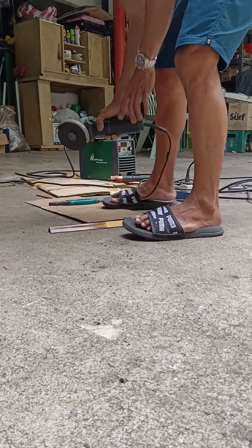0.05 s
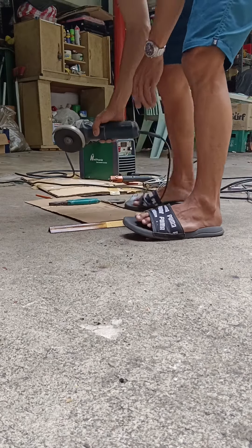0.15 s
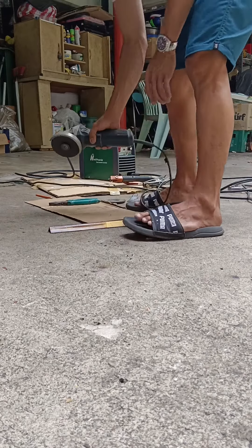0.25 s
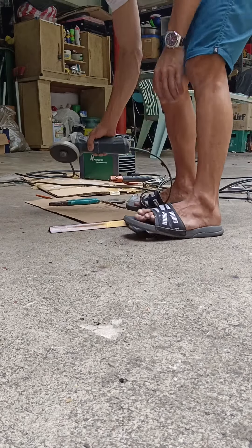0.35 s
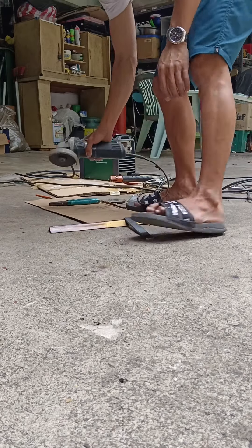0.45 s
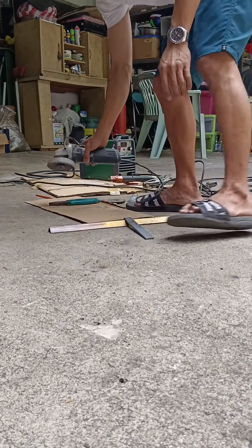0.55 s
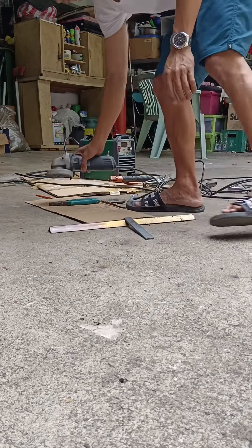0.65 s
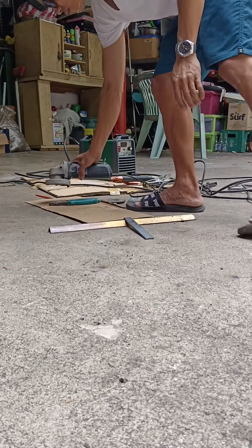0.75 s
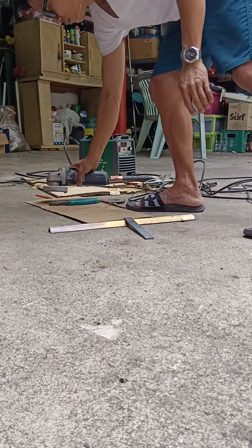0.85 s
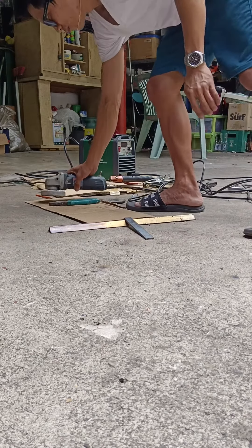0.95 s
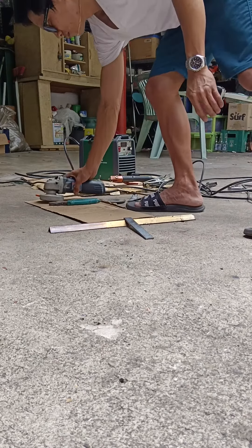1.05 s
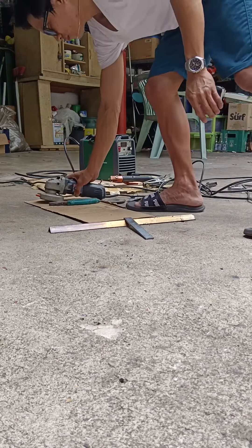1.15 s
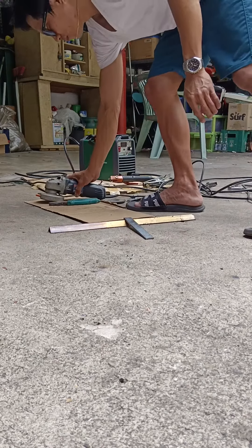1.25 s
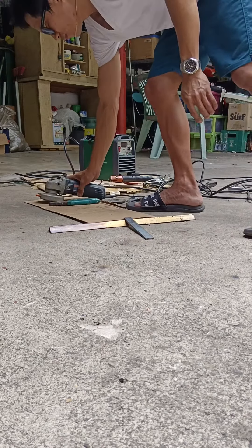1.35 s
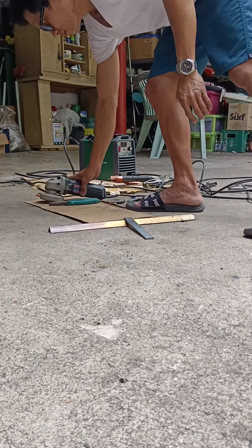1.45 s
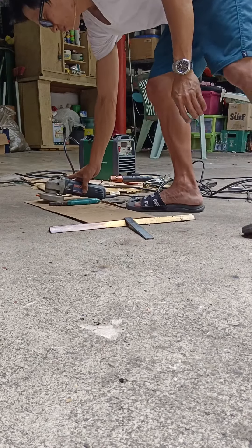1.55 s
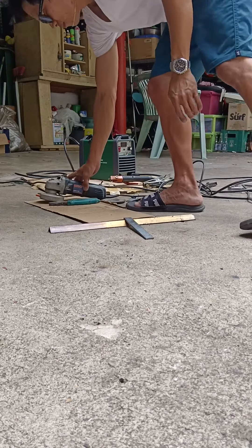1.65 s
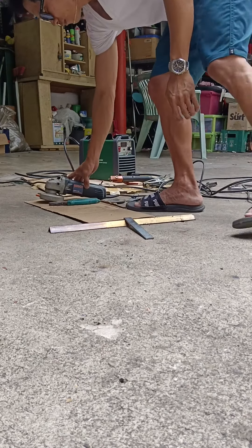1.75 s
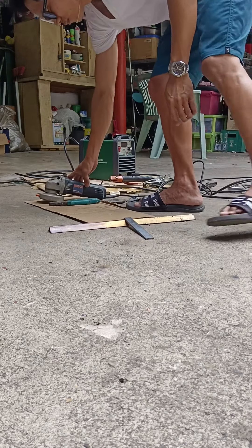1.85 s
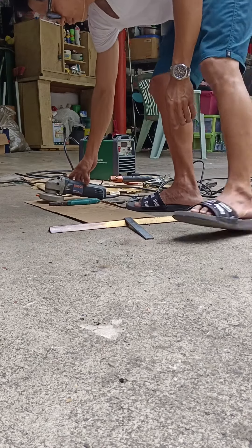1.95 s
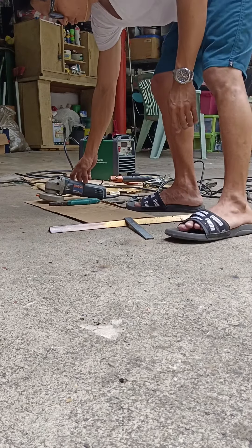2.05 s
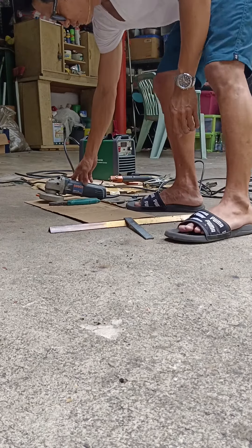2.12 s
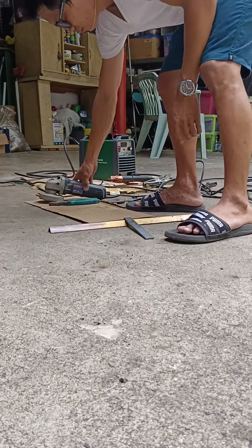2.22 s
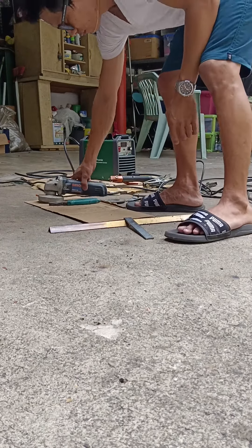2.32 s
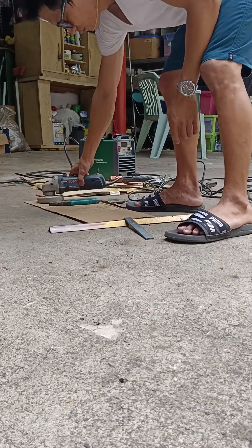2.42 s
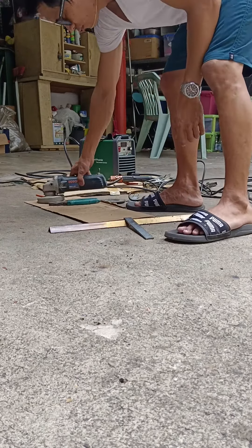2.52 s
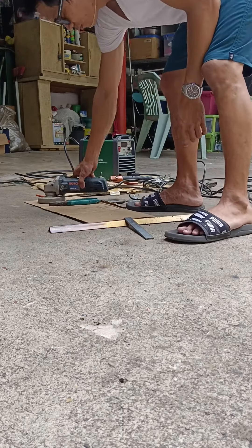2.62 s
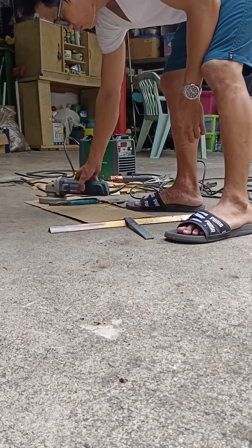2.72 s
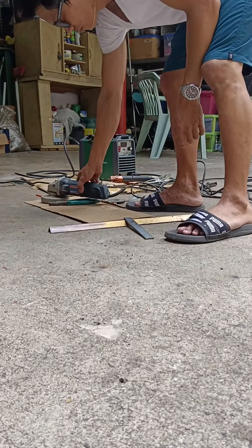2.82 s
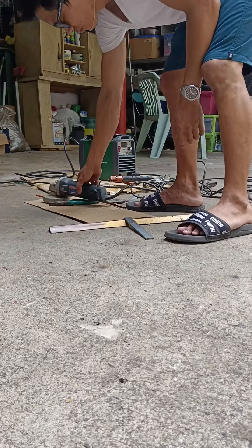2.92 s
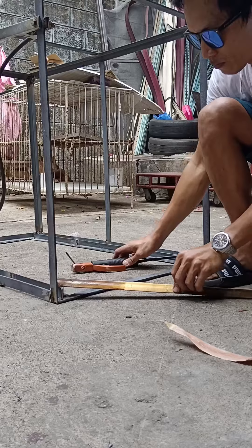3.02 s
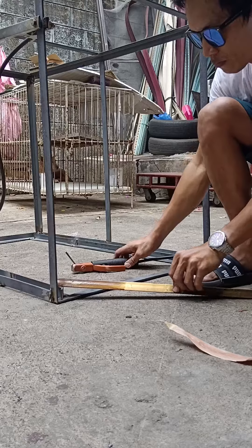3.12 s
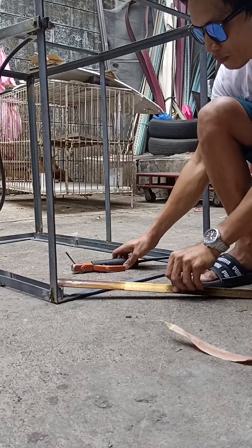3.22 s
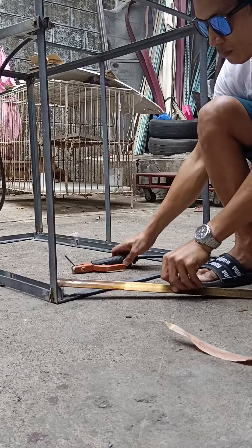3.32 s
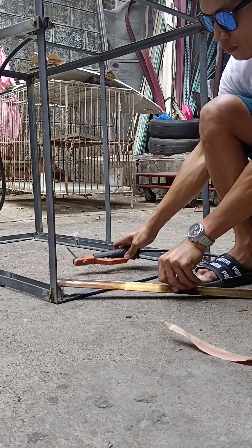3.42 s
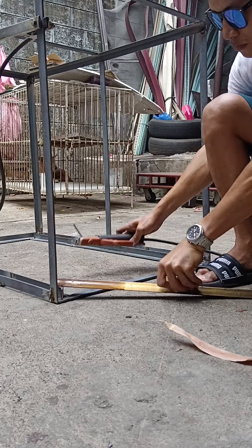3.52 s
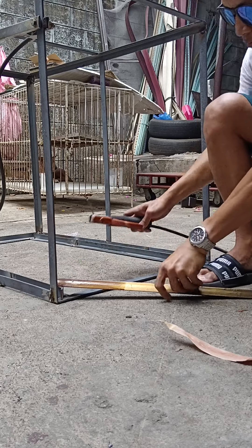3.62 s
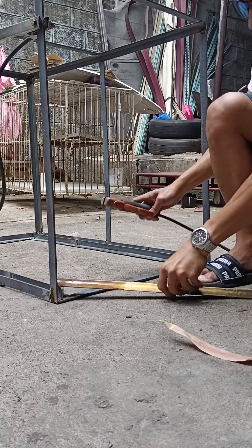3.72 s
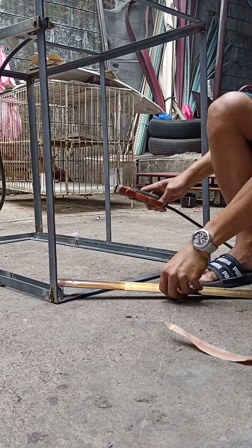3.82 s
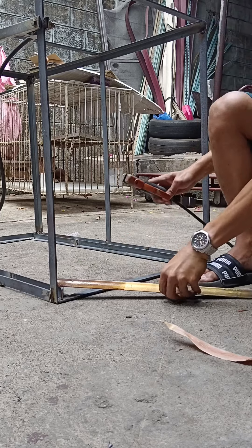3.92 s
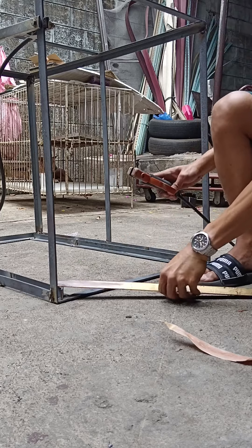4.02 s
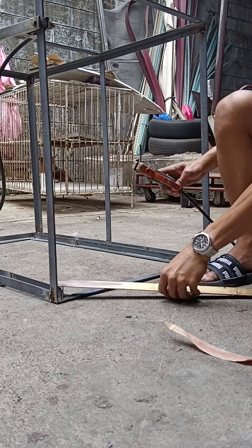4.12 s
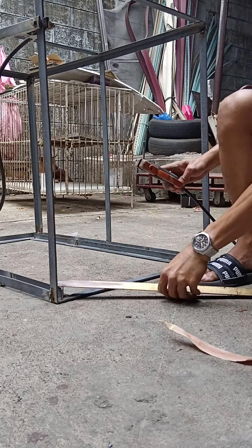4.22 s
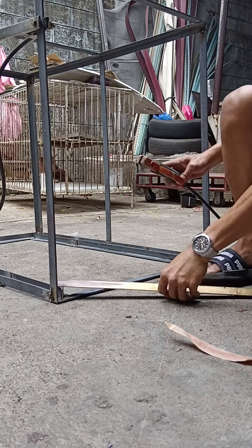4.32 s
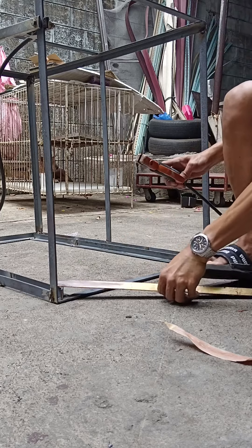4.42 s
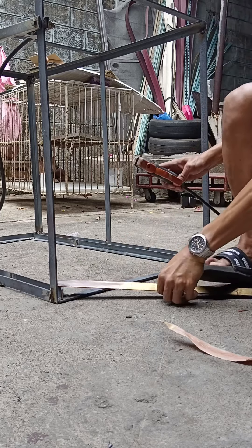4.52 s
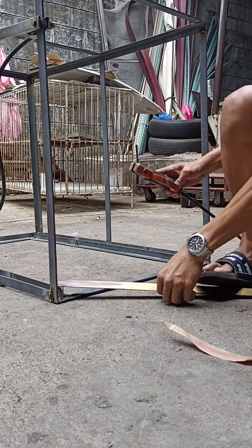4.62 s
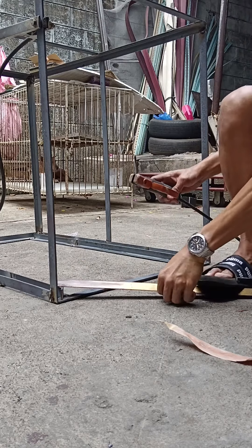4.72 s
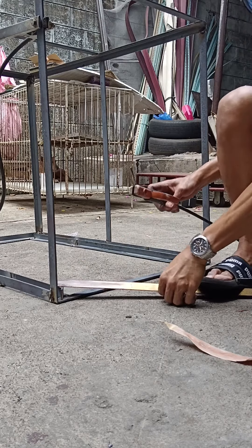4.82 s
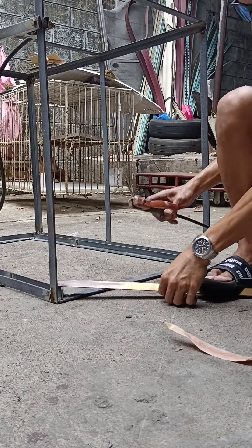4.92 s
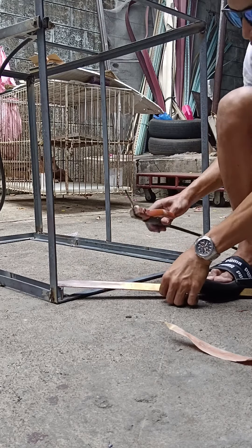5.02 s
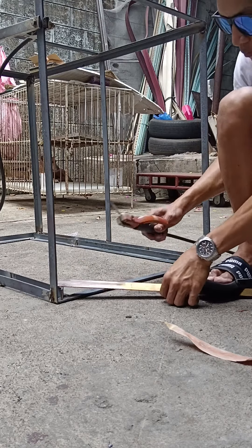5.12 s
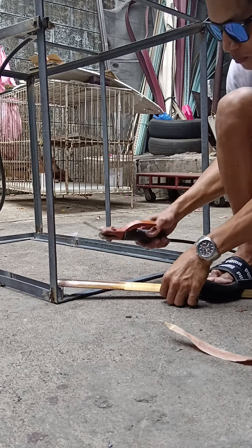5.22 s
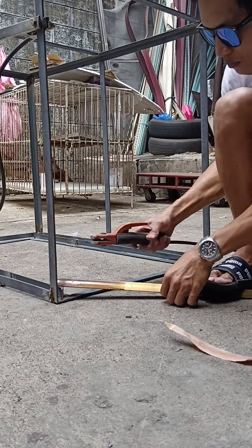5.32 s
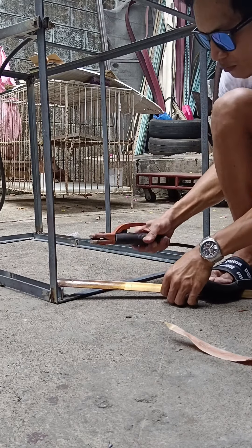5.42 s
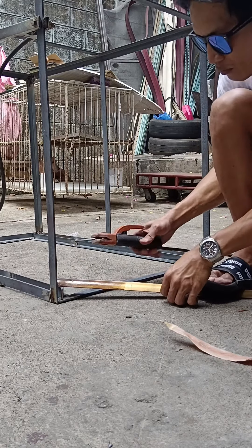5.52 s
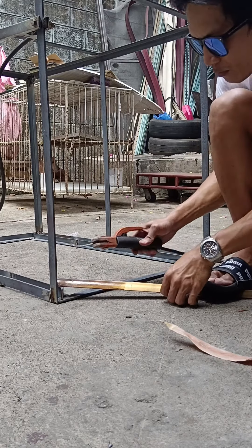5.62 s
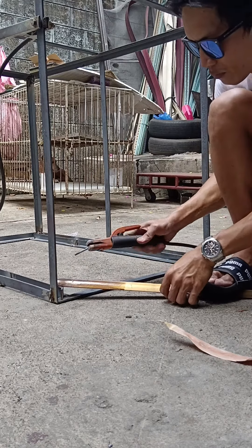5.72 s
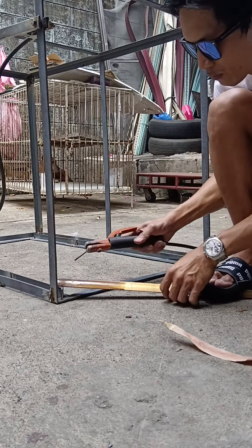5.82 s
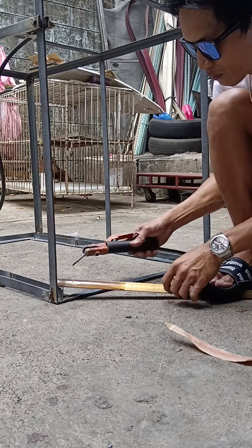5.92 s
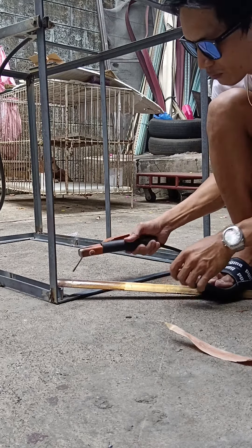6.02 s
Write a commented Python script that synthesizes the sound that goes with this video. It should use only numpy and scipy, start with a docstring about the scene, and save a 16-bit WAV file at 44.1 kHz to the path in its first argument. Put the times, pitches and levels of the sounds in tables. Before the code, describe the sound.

An angle grinder coasts down in a garage, whine sinking into gear rattle, then abruptly a quiet yard where a steel frame clangs.

```python
"""In a concrete garage an angle grinder coasts down: its rotor whine sinks, its gears hiss and rattle.
The whine is a sine; gears, hiss and growl are filtered noise; knocks and short fluttering tones join in.
The sound breaks off abruptly. In a quiet yard a welded steel frame is knocked and rings in clusters of
modes over a dense clatter. A tool ticks, feet thud, clothes rustle, thin tones squeak and softly clink,
and a low drone of narrow noise swells briefly on the left."""
import sys
import numpy as np
from scipy import signal
from scipy.fft import rfft, irfft
from scipy.io import wavfile
from scipy.ndimage import uniform_filter1d

SR = 44100
rng = np.random.default_rng(int(sys.argv[2]) if len(sys.argv) > 2 else 0)


def wav_record(signal):
    """Record a signal, one row per channel, as 16-bit PCM in the file named by sys.argv[1]."""
    frames = np.transpose(np.atleast_2d(signal))
    bounded = np.clip(frames, -1, 1)
    # unit amplitude maps onto the largest positive 16-bit level
    quanta = np.round(bounded * 32767).astype(np.int16)
    wavfile.write(sys.argv[1], SR, quanta)


N = 267246
T = np.arange(N) / SR  # time of each sample [s]
HZ = np.fft.rfftfreq(N, 1 / SR)  # frequency of each spectrum bin [Hz]
STOP_S = 2.937  # the grinder breaks off and the garage gives way to the yard


def amp(db):
    """Turns decibels into a gain."""
    return 10 ** (np.asarray(db) / 20)


def unit(x):
    """Scales to an rms of 1."""
    return x / np.sqrt(np.mean(x ** 2) + 1e-20)


def steadied(x):
    """Evens out slow level changes to a running rms of 1, keeping the fast grain."""
    return x / np.sqrt(abs(uniform_filter1d((x ** 2).mean(0), size=SR // 5)) + 1e-12)


def read(points, hz):
    """Reads a frequency table, with straight lines on a log-frequency axis."""
    f, value = np.transpose(points)
    return np.interp(np.log(hz + 1), np.log(f + 1), value)


def curve(rows, t=T):
    """Reads every column of a time table at times t."""
    s, *columns = np.transpose(rows)
    return [np.interp(t, s, c) for c in columns]


def lifts(resonances):
    """Bell-shaped resonances as a dB spectrum."""
    return sum(db / (1 + (2 * (HZ - hz) / width) ** 2) for hz, width, db in resonances)


def ripple(depth_db, width_hz):
    """Many small fixed peaks and dips from modes and near reflections, in dB for each microphone."""
    knots = np.arange(0, SR, width_hz)
    heights = rng.standard_normal((2, len(HZ)))[:, :len(knots)]
    return depth_db * np.array([np.interp(HZ, knots, np.clip(row, -1.7, 1.7)) for row in heights])


def colour(x, db):
    """Filters by a dB spectrum, keeping the power of white noise."""
    return irfft(rfft(x) * unit(amp(db)), N)


def ring(x, db):
    """Filters by a dB spectrum so that resonances ring only after they are struck."""
    cepstrum = irfft(np.log(unit(amp(db)) + 1e-5), N)
    # folding the cepstrum forward in time gives a minimum-phase filter
    cepstrum[1:N // 2] *= 2
    cepstrum[N // 2 + 1:] = 0
    taps = irfft(np.exp(rfft(cepstrum)), N)[:4096]
    return signal.oaconvolve(x, taps[None], axes=1)[:, :N]


def noise(likeness=((100, 0), (1000, 0))):
    """Stereo white noise whose channels are alike by a share that depends on frequency."""
    a, b = rfft(rng.standard_normal((2, N)))
    same = np.clip(read(likeness, HZ), -1, 1)
    return irfft(np.array([a, same * a + np.sqrt(1 - same ** 2) * b]), N)


def split(x, hz):
    """Splits a sound into the parts below and above a frequency."""
    low = signal.lfilter(*signal.butter(4, hz, fs=SR), x)
    high = signal.lfilter(*signal.butter(4, hz, "high", fs=SR), x)
    return low, high


def morph(x, rule, size=256):
    """Applies a gain in dB that follows rule(Hz, s)."""
    overlap = size * 3 // 4
    hz, t, z = signal.stft(x, SR, nperseg=size, noverlap=overlap)
    shaped = z * amp(rule(hz[:, None], t))
    return signal.istft(shaped, SR, nperseg=size, noverlap=overlap)[1][:, :x.shape[-1]]


def burst(s, rise, fall):
    """Envelope that rises from time s and dies away."""
    age = np.maximum(T - s, 0)
    return np.minimum(age / rise, 1) * np.exp(-np.minimum(age / fall, 50))


def swell(s, length):
    """Envelope that fades in and out around time s."""
    return np.exp(-(2 * (T - s) / length) ** 2)


def placed(x, balance, phase=((100, 0), (1000, 0))):
    """Leans a sound left or right and lets one microphone lead, by frequency."""
    lean = np.array([[.5], [-.5]])
    return irfft(rfft(x) * amp(lean * read(balance, HZ)) * np.exp(1j * lean * read(phase, HZ)), N)


# how long echoes of hard walls last: (frequency [Hz], time to fall by 60 dB [s])
ECHO_T60 = [(300, 0.43), (2000, 0.34), (6000, 0.24), (14000, 0.24)]


def room(x, wet_db):
    """Adds echoes of hard walls: fading noise, unrelated at the two microphones."""
    tail = morph(rng.standard_normal((2, SR // 2)), lambda hz, t: -60 * t / read(ECHO_T60, hz))
    tail *= np.minimum(T[:SR // 2] / 0.014, 1)
    wet = signal.fftconvolve(x, tail / np.linalg.norm(tail[0]), axes=1)[:, :N]
    return x + amp(wet_db) * wet


# the rotor coasting down: (time [s], speed [turns per second])
ROTOR_SPEED = [(0, 511), (.1, 486), (.3, 451), (.5, 421), (1.8, 250), (2.95, 124)]
GEAR_RATIO = 4.1  # rotor turns for one turn of the disc


def rotor_speed(t=T):
    """Rotor speed in turns per second, which sinks as the grinder coasts."""
    return curve(ROTOR_SPEED, t)[0]


# the whine holds its level, then fades as its pitch sinks
WHINE_DB, WHINE_FADES_BELOW_HZ, WHINE_FADE_DB_PER_HZ = -38.3, 450, 1.6
# pitches at which the whine dips: (pitch [Hz], width [Hz], level change [dB])
WHINE_DIPS = [(470, 18, -15), (435, 10, -17)]


def whine(waver=0.019):
    """The unbalanced rotor hums at its own speed, dips at some pitches and fades as it slows."""
    speed = rotor_speed()
    level = WHINE_DB - WHINE_FADE_DB_PER_HZ * np.maximum(WHINE_FADES_BELOW_HZ - speed, 0)
    level += sum(db * np.exp(-(2 * (speed - hz) / width) ** 2) for hz, width, db in WHINE_DIPS)
    wobble = unit(uniform_filter1d(rng.standard_normal(N), 300))
    turns = np.cumsum(speed * (1 + waver * wobble)) / SR
    return amp(level) * np.sqrt(2) * np.sin(2 * np.pi * turns)


# resonances of gear case and disc: (frequency [Hz], width [Hz],
# lift at full speed [dB], lift at middle speed [dB], lift when slowest [dB])
CASE_RESONANCES = [(776, 150, 0.5, 13.5, 10.5), (1010, 40, 1, -4, -4.5), (1049, 28, -2, 0, 20),
                   (1250, 170, -2, 4, 1.5), (1440, 20, 1, -2.5, -7), (1490, 80.5, -0.5, 1.5, 2.5),
                   (1748, 96, -4.5, 3, 8), (1996, 85, 4, 6, 9.5), (2130, 210, 6.5, 5.5, 3.5),
                   (2280, 73, 0.5, 2.5, -4.5), (2406, 260, 7.5, -1, 5.5), (2653, 200, -1.5, 4, 8),
                   (3140, 65, 3, -8, 8), (3375, 110, 0.5, 2, 12.5), (3830, 250, -5, -0.5, 6),
                   (4810, 250, -6, -4, -12.5), (5670, 540, 9, -1, 2.5), (6700, 240, 4, 0.5, 0),
                   (7290, 190, 4.5, 3.5, 3), (11800, 2700, 0.5, -0.5, 1)]


def case_lifts(stage):
    """The gear case's resonances at full (0), middle (1) or lowest (2) speed."""
    return lifts([(row[0], row[1], row[2 + stage]) for row in CASE_RESONANCES])


# how alike left and right are: (frequency [Hz], likeness [-1 to 1])
GRINDER_LIKENESS = [(60, 1), (400, 1), (700, .86), (1290, 0.52), (2380, 0.28), (4400, 0.18), (5700, .3),
                    (9000, .02)]


def case_noise(patchy_db, middle_speed=290, smooth_share=.55, size=1024):
    """Noise in the case's resonances, which shift in strength with speed and flare more as it slows."""
    def rule(hz, t):
        speed = rotor_speed(t)
        # blend the three stages: full, middle and lowest speed [turns per second]
        shares = [np.interp(-speed, [-460, -middle_speed, -160], one) for one in np.eye(3)]
        resonances = sum(np.interp(hz, HZ, case_lifts(stage)) * share for stage, share in enumerate(shares))
        flares = rng.standard_normal(resonances.shape)
        flares = uniform_filter1d(uniform_filter1d(flares, size=9, axis=1), size=2, axis=0)
        flares = np.minimum(unit(flares), 1.5)
        patchiness = patchy_db * (1 - smooth_share * (speed / speed.max()) ** 2)
        return resonances + patchiness * flares
    return colour(morph(noise(GRINDER_LIKENESS), rule, size=size), ripple(depth_db=3.0, width_hz=55))


def rattle(spread_db=-0.5, fall=0.0027):
    """The gears slap about twice in each turn of the disc, unevenly: an envelope of rms 1."""
    turns = np.cumsum(rotor_speed() / GEAR_RATIO * (1 + 6 * rng.standard_normal(N))) / SR
    slaps = np.diff(np.maximum.accumulate(np.floor(2 * turns)), prepend=0) > 0
    sizes = amp(spread_db * np.clip(rng.standard_normal(N), -2, 1.5))
    return unit(signal.lfilter([1], [1, -np.exp(-1 / (fall * SR))], slaps * sizes))


def looseness(fast=0.11, slow=.45):
    """The slower the grinder turns, the larger the share of its noise that rattles."""
    speed = rotor_speed()
    return np.clip(slow + (fast - slow) * speed / speed.max(), 0, 1)


def grain(share, slaps):
    """Mixes steady power with a share of the power of the slaps."""
    return np.sqrt(abs(1 - share + share * slaps ** 2))


# gear noise before its trim, also the base for ordinary knocks: (time [s], level [dB])
GEAR_LEVEL = [(0, -24.5), (.43, -27), (.55, -29.5), (1.1, -29.5), (1.55, -34), (1.72, -33.5), (1.92, -37),
              (2.08, -34), (2.27, -37), (2.41, -38), (2.49, -46), (2.56, -40), (2.75, -45), (2.92, -48.5)]
# tone of the gears: (frequency [Hz], relative level per Hz [dB])
GEAR_TONE = [(900, -60.5), (1250, -27.5), (1430, -17.5), (1570, -5), (1800, 0), (2400, -5), (2900, -4.5),
             (3800, -4), (4700, -11.5), (5500, -7.5), (8000, -50.5)]


def gear_noise(slaps, trim_db=1.2):
    """Meshing teeth make noise that rattles more as the gears slow."""
    gears = ring(case_noise(patchy_db=2.5) * grain(looseness(), slaps), read(GEAR_TONE, HZ))
    return amp(curve(GEAR_LEVEL)[0] + trim_db) * steadied(room(gears, wet_db=-7))


# the hiss before its trim: (time [s], level [dB])
HISS_LEVEL = [(0.13, -28.5), (1.33, -40), (2.2, -42), (2.85, -47.5)]
# tone of the hiss: (frequency [Hz], relative level per Hz [dB])
HISS_TONE = [(3500, -27.5), (4800, -2), (5600, -0.5), (6400, -4), (7500, -7), (8200, -10.5), (9800, -8.5),
             (11200, -8.5), (12100, -6.5), (13500, -13), (15700, -19)]


def hiss(slaps, trim_db=2.5, loose_share=0.59):
    """High noise that follows the same slaps, less strongly than the gears."""
    air = ring(case_noise(patchy_db=4.0) * grain(looseness() * loose_share, slaps), read(HISS_TONE, HZ))
    return amp(curve(HISS_LEVEL)[0] + trim_db) * steadied(room(air, wet_db=-15.5))


# the disc's growl before its trim: (time [s], level [dB])
GROWL_LEVEL = [(0.08, -33.5), (0.28, -33.5), (1.1, -40.5), (1.31, -47), (1.42, -44.5), (1.58, -52),
               (1.66, -45), (1.77, -62), (1.84, -55.5), (2.1, -66.5), (2.4, -72), (2.8, -78)]
# tone of the growl: (frequency [Hz], relative level per Hz [dB])
GROWL_TONE = [(300, -9), (800, -1.5), (1000, 1), (1300, -1), (1600, -4), (2200, -38)]
# there is no bass below an edge, which climbs by some Hz for each turn a second lost under a limit
GROWL_EDGE_HZ, GROWL_THINS_BELOW, GROWL_EDGE_CLIMB = 615, 250, 4.6


def growl(trim_db=2.55, edge_order=14):
    """The disc growls as low noise that loses its bass once the rotor is slow."""
    def bass_cut(hz, t):
        edge = GROWL_EDGE_HZ + GROWL_EDGE_CLIMB * np.maximum(GROWL_THINS_BELOW - rotor_speed(t), 0)
        return -10 * np.log10(1 + (edge / (hz + 1)) ** edge_order)
    disc = colour(case_noise(patchy_db=6.5), read(GROWL_TONE, HZ))
    disc = morph(disc, bass_cut, size=1024)
    return amp(curve(GROWL_LEVEL)[0] + trim_db) * steadied(disc)


# ordinary knocks: (rotor speed [turns per second], strike level over the gear level table [dB])
KNOCK_LIFT = [(130, 4), (200, 14), (230, 14), (330, 4.5), (510, 6)]
# hard knocks that stand out: (time [s], strike level before ringing [dB], treble against low part [dB])
HARD_KNOCKS = [(.238, -13, -13), (1.759, -17.5, -8), (1.79, -13, -10), (1.819, -21, -13), (1.886, -18, 4),
               (1.909, -26, -4), (1.966, -19.5, -16), (2.001, -18.5, -17), (2.121, -23, -14),
               (2.139, -20.5, -18), (2.170, -21.5, -13), (2.201, -19.5, -7), (2.218, -18.5, -12),
               (2.256, -24, -8), (2.278, -19.5, -11), (2.358, -22.5, -13), (2.391, -20, -12),
               (2.410, -21, -6), (2.435, -28, -11), (2.454, -25, -1), (2.480, -26, -3), (2.535, -19, -14),
               (2.578, -24.5, -12), (2.600, -30, -8), (2.622, -26.5, -10), (2.700, -23, -7),
               (2.720, -26, -4), (2.756, -25.5, -16), (2.788, -26.5, 5), (2.819, -28.5, -5),
               (2.852, -24, 5), (2.878, -26.5, 8), (2.893, -27.5, -2), (2.926, -22.5, -12)]
# tone of a knock: (frequency [Hz], relative level per Hz [dB])
KNOCK_TONE = [(900, -44), (1400, -12), (1900, -1.5), (3400, -4), (4300, -2.5), (6000, -5), (8000, -19.5),
              (15000, -26)]


def knocks(rise=0.0018, fall=0.0029, jitter=1.3, spread_db=2.1, treble_db=-12, treble_spread_db=3):
    """About once a turn of the disc the teeth knock through their backlash and ring the gear case."""
    speed = rotor_speed()
    slip, force, edge = np.clip(rng.standard_normal((3, N)), -1.6, 1.6)
    turns = np.cumsum(speed / GEAR_RATIO * (1 + jitter * slip)) / SR
    new_turn = np.diff(np.maximum.accumulate(np.floor(turns)), prepend=0) > 0
    level = curve(GEAR_LEVEL)[0] + read(KNOCK_LIFT, speed) + spread_db * force
    size = amp(level) * new_turn
    treble = amp(treble_db + treble_spread_db * edge)
    for s, db, bright_db in HARD_KNOCKS:
        size[abs(T - s) < .012] = 0  # a hard knock takes the place of ordinary ones close by
        size[round(s * SR)] = amp(db)
        treble[round(s * SR)] = amp(bright_db)
    touch = burst(0, rise, fall)[:SR // 20]
    strike = size / np.hypot(1, treble)
    dull = signal.oaconvolve(strike, touch)[:N]
    bright = signal.oaconvolve(strike * treble, touch)[:N]
    low, high = split(np.sign(noise()), 2900)
    return ring(low * dull + high * bright, read(KNOCK_TONE, HZ) + case_lifts(2))


# brief tones of the grinder, disc tones but for a last swell of the whine near 0.47 s:
# (middle [s], length [s], pitch [Hz], glide [Hz per s], level [dB])
BRIEF_TONES = [(.33, .09, 710, -8, -40.5), (.47, .09, 411, -58.5, -54.5), (1.14, 0.094, 800, 0, -48.5),
               (1.26, 0.086, 867, 0, -50.5), (1.35, .11, 770, -600, -46), (1.44, 0.09, 595, -700, -51.5),
               (1.46, 0.15, 1073, -200, -48.5), (1.55, 0.15, 785, 14, -48), (1.65, 0.088, 1068, 0, -50),
               (1.66, .1, 778, 6, -47), (1.83, 0.1, 692, -2, -55), (1.84, 0.092, 882, -900, -53.5),
               (1.94, .1, 805, 500, -53.5), (2.02, 0.13, 1066, 0, -59), (2.07, 0.082, 794, 0, -57.5),
               (2.26, 0.065, 1084, 0, -66), (2.36, .11, 1068, 0, -59), (2.41, 0.096, 1566, 0, -50),
               (2.55, 0.083, 1080, 0, -65.5)]


def brief_tones(flutter=1.0, flutter_hz=28):
    """Short fluttering tones: the slowing shaft shakes the disc's modes, and the whine swells a last time."""
    out = np.zeros(N)
    for s, length, hz, glide, db in BRIEF_TONES:
        near = abs(T - s) < 1.5 * length
        t = T[near] - s
        shake = [1, 1j] @ rng.standard_normal((2, SR))
        shake = signal.lfilter(*signal.butter(2, flutter_hz, fs=SR), shake)[-len(t):]
        tone = (1 + flutter * shake / np.std(shake)) * np.exp(2j * np.pi * (hz + glide * t / 2) * t)
        out[near] += amp(db) * np.exp(-(2 * t / length) ** 2) * unit(tone.real)
    return out


# lean of the grinder: (frequency [Hz], left over right [dB])
GRINDER_BALANCE = [(60, -0.5), (110, 1), (310, 2), (450, 3), (700, 1), (950, 0), (1650, 1), (2860, 1),
                   (4970, 3), (8640, -.5), (15000, -4.5)]
# head start of the left microphone: (frequency [Hz], phase lead [radians])
GRINDER_LEAD = [(100, 0.9), (700, 0.19), (1500, -.9), (3000, -1), (8000, 0)]


def grinder():
    """Gears, hiss, growl, brief tones, whine and knocks together, until they break off."""
    slaps = rattle()
    sound = gear_noise(slaps) + hiss(slaps) + growl() + brief_tones() + whine()
    sound = sound + room(knocks(), wet_db=-11.5)
    return placed(sound, GRINDER_BALANCE, GRINDER_LEAD) * np.clip((STOP_S - T) / 0.0023, 0, 1)


GARAGE_DB, YARD_DB = -67, -64.5
# tone of the garage: (frequency [Hz], relative level per Hz [dB])
GARAGE_TONE = [(25, -25), (70, -6.5), (130, -1.5), (200, -4.5), (300, -3), (420, -8), (600, -9.5),
               (1000, -11), (2000, -17.5)]
# tone of the yard: (frequency [Hz], relative level per Hz [dB])
YARD_TONE = [(25, -29), (55, -19), (90, 1), (135, -9.5), (205, -7.5), (330, -8.5), (520, -14), (780, -13),
             (1000, -15), (1450, -18.5), (2200, -19.5), (3300, -24), (4600, -32.5), (7200, -38),
             (8500, -47), (15500, -41)]
# faint far hums and whistles: (frequency [Hz], width [Hz], lift [dB])
YARD_HUMS = [(210, 6.4, 4.6), (723, 28, 5.9), (956, 37, 7.7), (1470, 54, 3), (3600, 370, 2.2),
             (6700, 190, 11)]
# how alike left and right are: (frequency [Hz], likeness [-1 to 1])
YARD_LIKENESS = [(60, 1), (130, 0.99), (290, 0.94), (640, 0.4), (1410, 0.6), (3100, -0.22), (6820, -0.057),
                 (15000, -0.02)]


def yard():
    """The garage's low room tone gives way to the distant hum outdoors, both steady filtered noise."""
    indoors = amp(GARAGE_DB) * colour(noise(YARD_LIKENESS), read(GARAGE_TONE, HZ))
    hum = read(YARD_TONE, HZ) + lifts(YARD_HUMS) + ripple(depth_db=1, width_hz=44)[0]
    outdoors = amp(YARD_DB) * colour(noise(YARD_LIKENESS), hum)
    outside = np.clip((T - STOP_S) / 0.0064, 0, 1)
    return (1 - outside) * indoors + outside * outdoors


# feet and handling, before the trim: (time [s], level [dB])
THUDS = [(.17, -61), (.23, -63), (.64, -57), (2.0, -61.5), (2.97, -57), (3.70, -55), (3.81, -60.5),
         (3.94, -54), (5.36, -56.5), (5.8, -61.5)]
# tone of a thud: (frequency [Hz], relative level per Hz [dB])
THUD_TONE = [(25, -17), (60, -13), (90, 9.5), (120, -7.5), (200, -33), (500, -53)]


def thuds(fall=0.029, trim_db=4):
    """Feet and handling make soft, quickly fading bumps of low noise."""
    # each bump starts 15 ms before its listed time
    envelope = sum(amp(db + trim_db) * burst(s - .015, 0.02, fall) for s, db in THUDS)
    return envelope * colour(noise(YARD_LIKENESS), read(THUD_TONE, HZ))


# blows on the frame: (time [s], ring level [dB], clatter level [dB], rise [s],
# dull above [Hz], spread of each mode [share of its pitch])
BLOWS = [(2.969, -37.5, -41, 0.015, 7300, 0.015), (4.0673, -32, -26.5, 0.0027, 13400, 0.016),
         (4.325, -50, -49.5, 0.0034, 3140, 0.023)]
# modes of the frame: (pitch [Hz], time to fall by 60 dB [s],
# relative level at the first spot [dB], relative level at the second spot [dB])
FRAME_MODES = [(1290, 0.84, -39.5, -7.5), (1470, 0.79, -15, -7), (1674, 0.66, -33, 0), (1886, 0.98, -3, 1),
               (2002, 1.02, -2, 0), (2102, 1.1, -23, -1), (2136, 1.16, -26, -13), (2280, 0.74, -6, -3.5),
               (2490, 0.64, -2.5, -1), (2697, 0.37, 4, -8.5), (2850, 0.61, 4.5, 1), (3080, 0.5, -10, 3.5),
               (3310, 0.54, -5, -11), (3455, 0.66, -5, 1), (3700, 0.62, -6, -5), (3960, 0.3, 4, -13),
               (4060, 0.54, -3, 4), (4260, 0.51, -1, -0.5), (4500, .35, -6, -7), (4620, 0.39, -1, -10),
               (4900, .35, -3, -11), (5250, 0.41, 0, 2), (5470, 0.41, -10, 0), (5580, 0.44, -2, -4),
               (5860, 0.5, -7, 2), (6240, 0.36, -3, -22), (6770, 0.4, -9, -10), (7130, 0.35, -10, -12)]
# dense upper modes and echoes: (frequency [Hz], relative level per Hz [dB])
CLATTER_TONE = [(800, -42), (1150, -23), (1400, -6), (2000, -7), (3000, 3.5), (4100, 0.5), (5000, -1.5),
                (5900, -2.5), (6200, -5), (7000, -14), (9000, -10.5), (12000, -11.5), (15500, -20)]
# fading of the clatter: (frequency [Hz], time to fall by 60 dB [s])
CLATTER_T60 = [(1300, 0.52), (2100, 0.76), (3300, 0.51), (4000, 0.38), (5800, 0.55), (8000, 0.34),
               (14000, 0.31)]
# lean of the frame: (frequency [Hz], left over right [dB])
FRAME_BALANCE = [(1300, -2), (2400, 0.5), (4400, 1.5), (8000, 1.5), (15000, -9)]


def frame(slow_below_hz=4000, slow_power=1.35):
    """Each blow rings the frame's near-equal bars, in beating clusters of modes, over a dense clatter."""
    out = np.zeros((2, N))
    t, f = T[:SR], np.fft.rfftfreq(SR, 1 / SR)
    dense = colour(noise(), read(CLATTER_TONE, HZ) + ripple(depth_db=2.5, width_hz=62))
    for k, (s, ring_db, clatter_db, rise, dull_hz, spread) in enumerate(BLOWS):
        spot = min(k, 1)  # the later blows land on the second spot
        piece = dense[:, k * SR:][:, :SR]
        clatter = morph(piece, lambda hz, age: -60 * age / read(CLATTER_T60, hz))
        bars = np.exp(2j * np.pi * rng.random((2, len(f))))
        modes = np.zeros((2, SR))
        for hz, t60, *spot_db in FRAME_MODES:
            cluster = irfft(bars * np.exp(-((f / hz - 1) / spread) ** 2), SR)
            # low modes take longer to swell
            build = np.minimum(t / (rise * (slow_below_hz / hz) ** slow_power), 1)
            modes += amp(spot_db[spot] - 60 * t / t60) * build * steadied(cluster)
        modes /= np.std(modes[:, :SR // 20])
        blow = amp(clatter_db) * clatter * np.minimum(t / rise, 1) + amp(ring_db) * modes
        dulled = signal.lfilter(*signal.butter(3, min(dull_hz, .45 * SR), fs=SR), blow)
        out[:, round(s * SR):][:, :SR] += dulled
    return placed(out, FRAME_BALANCE)


# ticks of a hand tool: (time [s], contact level before ringing [dB], fading time [s],
# treble against low part [dB])
TICKS = [(3.392, -65, 0.0065, -11), (4.334, -52, .006, -11), (4.343, -43, 0.0055, -17),
         (4.424, -64, 0.02, 3.5), (4.439, -55, 0.0067, -2), (4.451, -45.5, 0.0024, 0),
         (4.459, -56, 0.0027, 7), (4.467, -51, .004, -2), (4.485, -66, 0.022, 5),
         (4.545, -69.5, 0.0073, -12), (4.595, -56.5, 0.0034, -20), (4.615, -68.5, 0.025, -24),
         (5.163, -66, 0.012, -13), (5.208, -76, 0.014, 6)]
# tone of a tick: (frequency [Hz], relative level per Hz [dB])
TICK_TONE = [(1000, -18), (2500, 0), (4300, -9), (5400, 9.5), (6100, 3), (7000, -10), (9000, -5),
             (11500, 4.5), (15500, -4)]


def ticks():
    """Short scraping contacts of a small steel tool, some brighter than others."""
    body, top = np.zeros((2, N))
    for s, db, contact, treble_db in TICKS:
        touch = amp(db) * burst(s, 0.00035, contact)
        body += touch
        top += touch * amp(treble_db)
    low, high = split(noise(), 7000)
    return room(ring(low * body + high * top, read(TICK_TONE, HZ)), wet_db=-6.5)


# faint brushes of clothing: (middle [s], length [s], level [dB])
RUSTLES = [(3.63, .09, -82.5), (5.088, 0.073, -85.5), (5.312, 0.32, -82), (5.53, .07, -84.5),
           (5.751, .1, -84)]
# tone of the clothing: (frequency [Hz], relative level per Hz [dB])
RUSTLE_TONE = [(6000, -26.5), (8500, -19.5), (9800, 3), (11000, -3), (12300, 3), (15500, -8)]


def rustles():
    """Clothes brush softly: high noise that fades in and out."""
    envelope = sum(amp(db) * swell(s, length) for s, length, db in RUSTLES)
    return envelope * colour(noise(), read(RUSTLE_TONE, HZ))


# faint thin squeaks, with the short high partials of a soft clink near 5.2 s:
# (middle [s], length [s], pitch [Hz], peak level [dB])
THIN_TONES = [(3.80, 0.25, 5560, -80), (3.964, 0.1, 3720, -67), (3.988, 0.12, 5270, -77),
              (5.192, 0.096, 3670, -73), (5.188, 0.06, 5000, -76), (5.22, 0.068, 5400, -73),
              (5.401, 0.24, 1480, -71.5), (5.77, 0.14, 5300, -78), (5.908, 0.1, 5500, -76)]


def squeaks_and_clink(waver=0.016):
    """Squeaks and the partials of a soft clink: thin sines of unsteady pitch that fade in and out."""
    glide = 1 + waver * unit(uniform_filter1d(rng.standard_normal((2, N)), size=200))
    turns = np.cumsum(glide, axis=1) / SR
    return sum(amp(db) * swell(s, length) * np.sin(2 * np.pi * hz * turns) for s, length, hz, db in THIN_TONES)


DRONE_DB = -55.5  # before the left and right gains
DRONE_START_S, DRONE_ATTACK_S, DRONE_END_S, DRONE_RELEASE_S = 4.986, 0.3, 5.68, 0.18
# tone of the drone: (frequency [Hz], relative level per Hz [dB])
DRONE_TONE = [(120, -37.5), (165, -8), (195, -24), (210, 10), (225, -17), (255, -5.5), (310, -17.5),
              (400, -23.5), (900, -73.5)]


def drone(left_db=4, right_db=-11):
    """A narrow, fluttering low resonance swells, holds and dies close to the left microphone."""
    tone = colour(rng.standard_normal(N), read(DRONE_TONE, HZ))
    tone /= np.sqrt(uniform_filter1d(tone ** 2, SR // 8))
    fade_in = (T - DRONE_START_S) / DRONE_ATTACK_S
    fade_out = (DRONE_END_S - T) / DRONE_RELEASE_S
    envelope = np.clip(np.minimum(fade_in, fade_out), 0, 1)
    return amp([[left_db], [right_db]]) * tone * amp(DRONE_DB) * envelope


def scene():
    """All sources together."""
    in_garage = grinder() + yard() + thuds()
    return in_garage + frame() + ticks() + rustles() + squeaks_and_clink() + drone()


EDGE_HZ = 15700  # upper limit of the sound


def record(dry):
    """Takes away the highest treble with a steep low-pass filter."""
    taps = signal.firwin(511, EDGE_HZ, window=("kaiser", 9), fs=SR)
    return signal.oaconvolve(dry, taps[None], "same")


dry = scene()
out = record(dry)
wav_record(out)
```